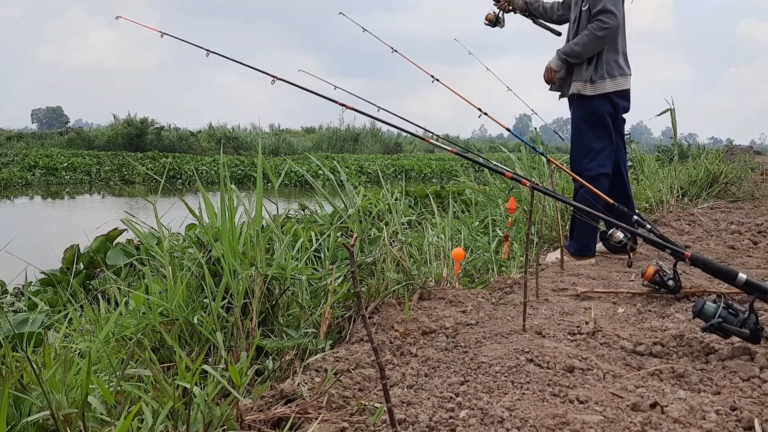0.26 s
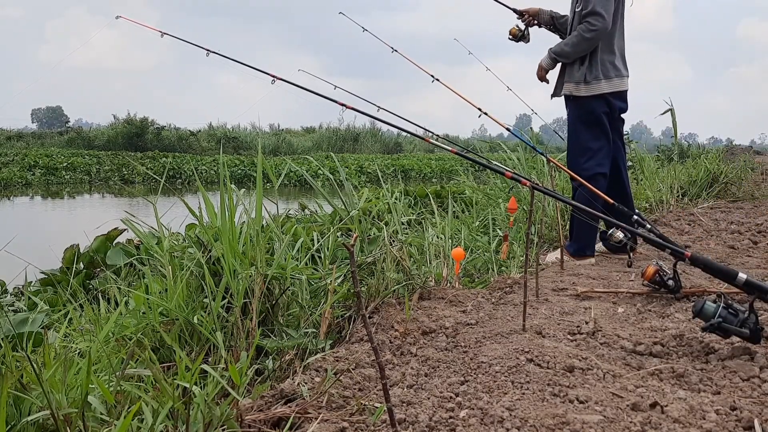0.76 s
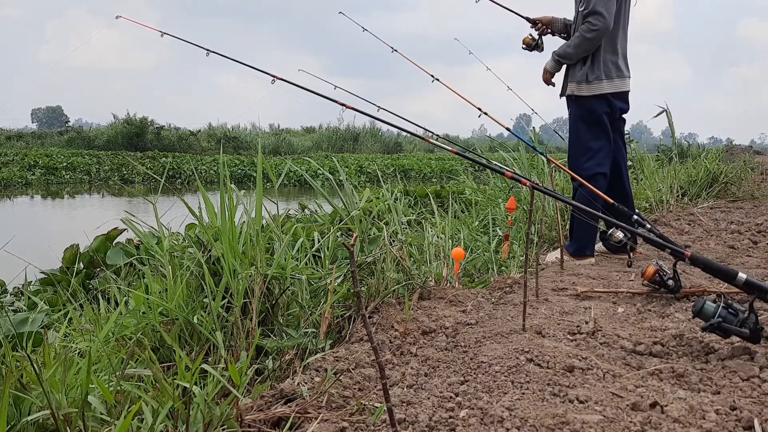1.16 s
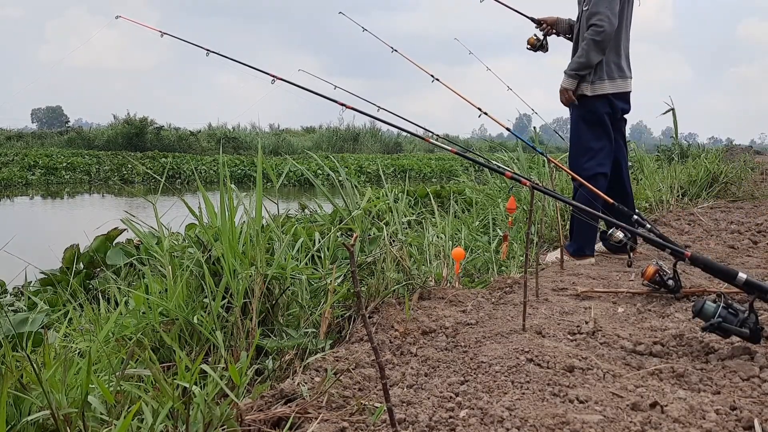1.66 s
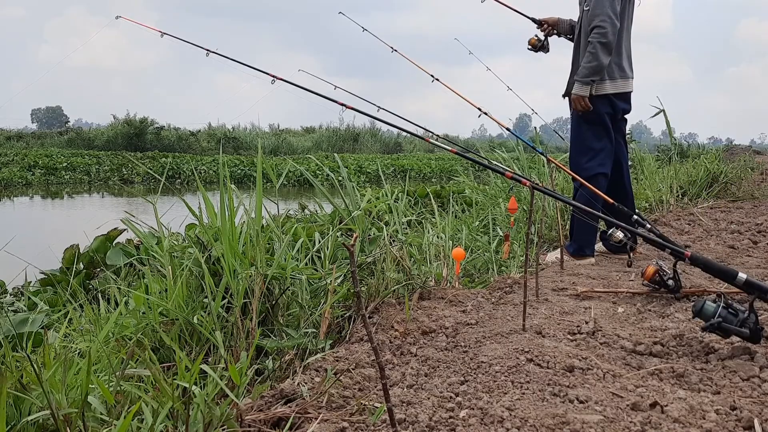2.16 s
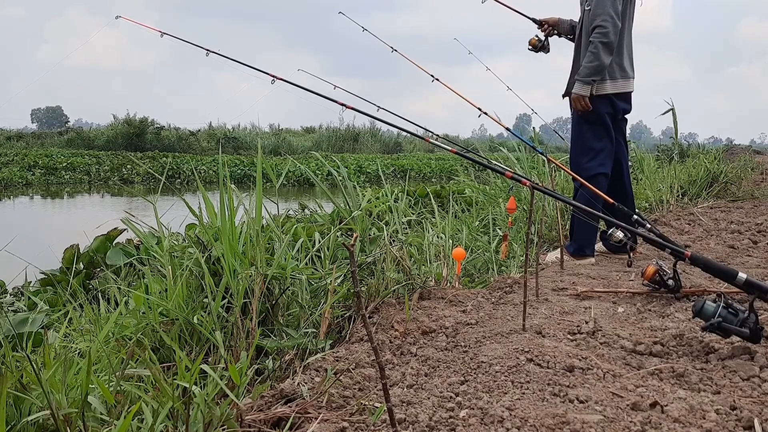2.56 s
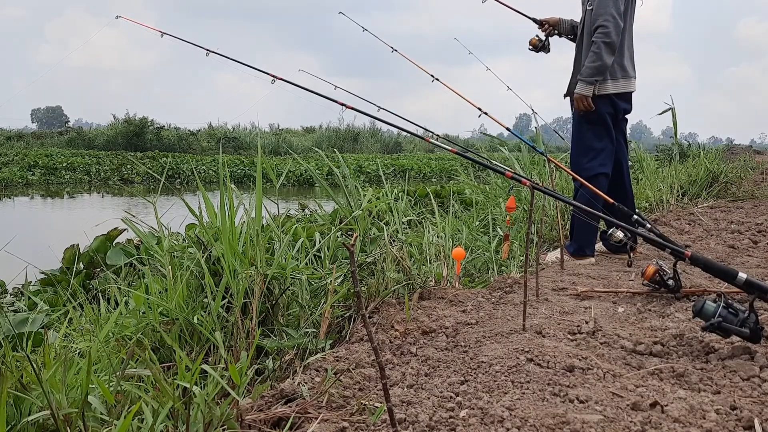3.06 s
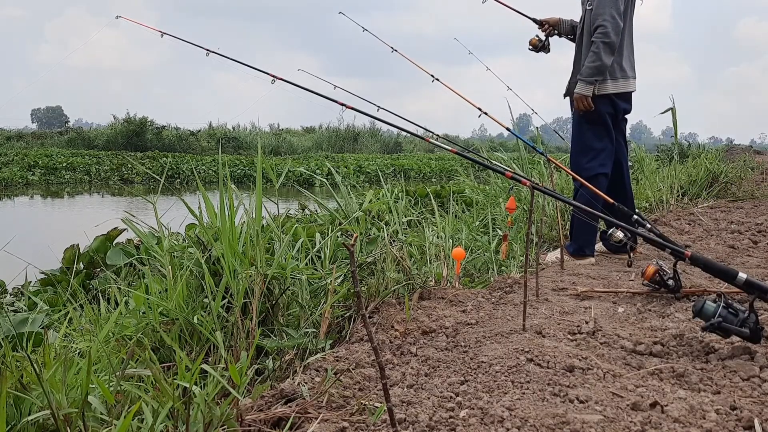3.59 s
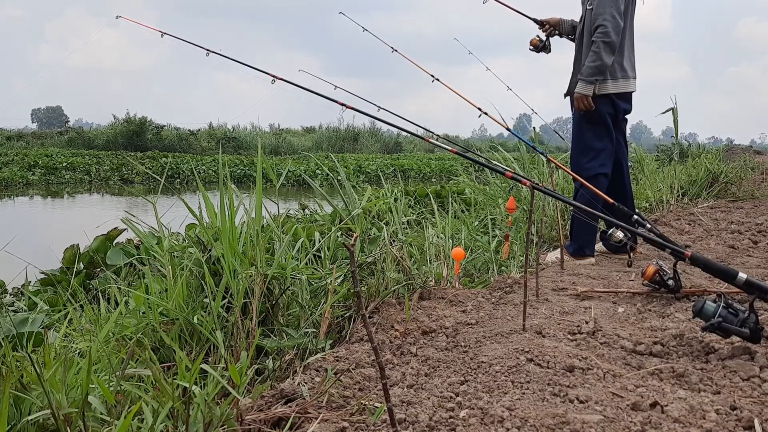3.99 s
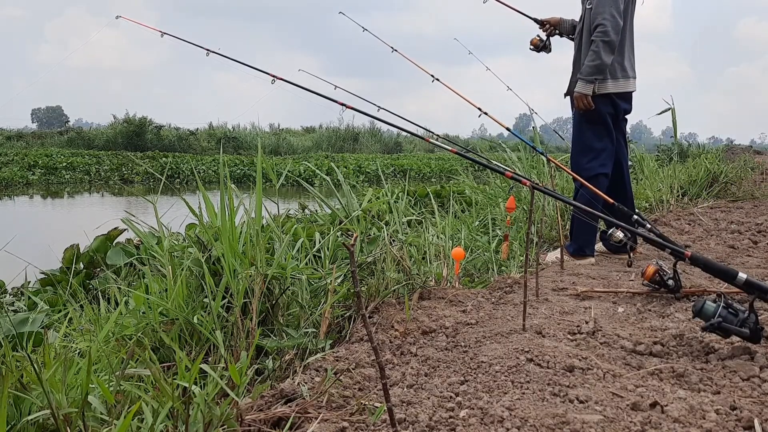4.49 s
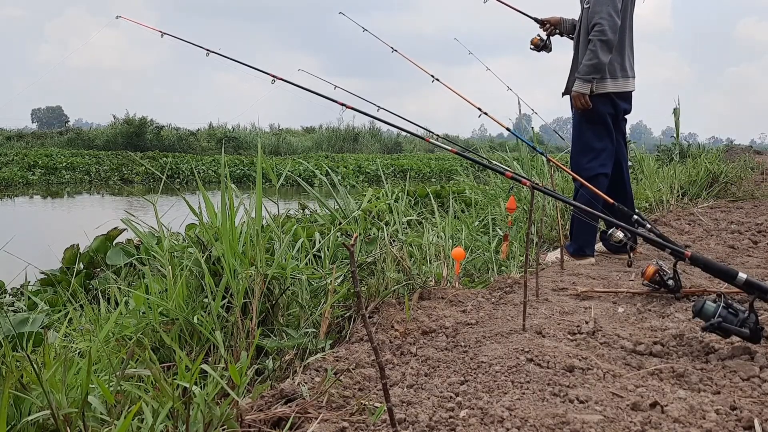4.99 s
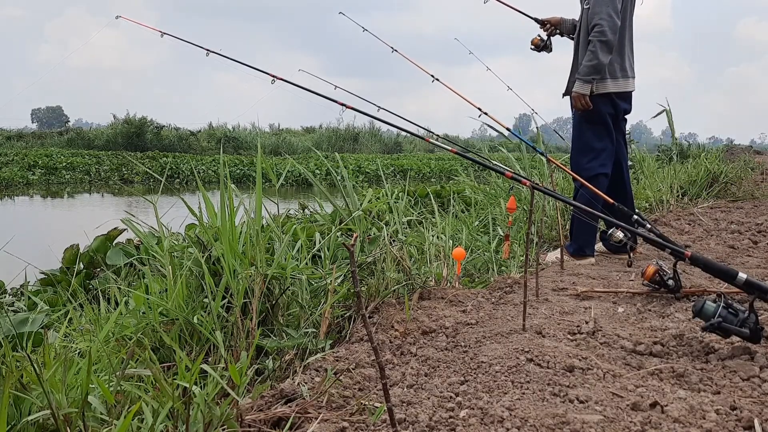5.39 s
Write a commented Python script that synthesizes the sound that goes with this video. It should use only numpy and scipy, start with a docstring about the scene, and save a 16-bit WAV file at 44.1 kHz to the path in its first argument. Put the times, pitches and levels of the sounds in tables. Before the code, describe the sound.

On an open river bank, wind rumbles on the microphone throughout while a distant small engine drones low, fading and swelling with the breeze. Soft gusts thump the right side, mostly around the middle and again near the end. Far quieter, grass hisses and ticks, a cricket pulses, distant road traffic murmurs and a bird gives a few short whistles. The engine fades toward the end.

```python
"""A breezy river bank. Throughout, a far single-cylinder engine drones over air rumbling on the
microphone, hissing, ticking grass, a pulsing cricket and road murmur from the right. An eddy thumps
the right port at once. From 0.7 s a bird whistles faintly; near 0.9 s the exhaust note fades on the
wind, then swells back. More eddies strike from 1.9 to 3.6 s and near 4.8 s. Toward the end the
engine slows slightly and fades again."""
import sys
import numpy as np
from scipy import signal
from scipy.fft import rfft, irfft, next_fast_len
from scipy.io import wavfile
from scipy.ndimage import uniform_filter1d

SR = 44100
rng = np.random.default_rng(int(sys.argv[2]) if len(sys.argv) > 2 else 0)


def store_wav(level_fs):
    """Save 16-bit WAV to argv[1]."""
    pcm = np.round(np.clip(np.atleast_2d(level_fs), -1, 1) * 32767)
    wavfile.write(sys.argv[1], SR, pcm.T.astype(np.int16))


N = 248724
T = np.arange(N) / SR

# Traffic flow. Each row: time in seconds, roar level in dB before trim.
TRAFFIC_LEVEL = [(0.0, -62), (0.5, -60.5), (1.0, -63.5), (3.4, -59), (5.2, -59.5), (5.64, -62)]
# Passing vehicles. Each row: peak time in seconds, half length in seconds, roar lift in dB,
# tyre whine in Hz, whine level in dB.
VEHICLES = [(2.05, .3, 1.3, 790, -60), (2.85, 0.078, 2, 810, -62), (3.68, 0.1, 3.5, 850, -59),
            (4.35, 0.14, 2.2, 873, -60), (5.0, 0.32, 0.4, 850, -64)]
# Tyre roar. Each row: frequency in Hz, relative density in dB.
ROAD_SPECTRUM = [(250, -13), (420, -6.5), (590, -2.5), (780, 6.5), (930, 3), (1150, -13), (1450, -21),
                 (2200, -18.5), (4000, -36)]
# Bird whistles. Each row: peak time in seconds, length in seconds, pitch in Hz, level in dB before pan.
BIRD_CALLS = [(.72, 0.18, 1782, -69), (1.46, 0.22, 2880, -74), (1.989, 0.077, 3145, -69),
              (2.219, 0.16, 2890, -68), (2.441, 0.087, 2810, -68.5), (2.632, 0.074, 2744, -70),
              (3.539, .05, 3098, -68)]
# Breeze in the grass. Each row: time in seconds, hiss level in dB before trim.
BREEZE_LEVEL = [(0.0, -59.5), (0.45, -58), (0.9, -63.5), (1.5, -58), (1.85, -55.5), (2.7, -58.5),
                (3.25, -62), (3.55, -60), (4.1, -65), (4.72, -61.5), (5.05, -64), (5.27, -61), (5.45, -66),
                (5.64, -64.5)]
# Where the grass stirs. Each row: time in seconds, left minus right in dB.
GRASS_PAN = [(0.0, 2), (1.2, 2), (2.1, -1.5), (4.7, 0.5), (5.64, 0.5)]
# Rubbing blades. Each row: frequency in Hz, relative density in dB.
GRASS_SPECTRUM = [(1200, -5), (2800, -1), (4400, -3.5), (6200, 3), (8400, 4), (9700, -0.5), (11500, 2),
                  (13500, 1), (15500, -1)]
# Steady meadow hiss. Each row: frequency in Hz, relative density in dB.
MEADOW_SPECTRUM = [(500, 8.5), (1800, 0.5), (3300, -2), (4800, -2), (6800, -12), (7500, 3.5), (8050, -1),
                   (8600, -0.5), (9600, -5), (10900, -5), (11400, -1), (11900, -11), (15500, -13)]
# Dry blade flicks. Each row: start in seconds, length in seconds, centre in Hz, left and right in dB.
BLADE_TICKS = [(0.386, 0.019, 10500, -53, -61), (0.978, 0.009, 10050, -51, -66),
               (1.207, 0.011, 9550, -50.5, -63), (1.224, 0.041, 11530, -50.5, -64),
               (2.58, 0.011, 11050, -62, -56), (2.758, 0.0078, 12000, -51, -66),
               (2.78, .008, 12000, -51, -64), (2.847, 0.011, 6700, -58, -50.5),
               (2.867, 0.011, 6600, -62, -52), (4.455, 0.019, 7200, -70, -52),
               (4.725, .022, 11550, -59, -60), (4.887, 0.013, 10000, -61, -55),
               (5.597, 0.015, 11060, -58, -65)]
# Air rumble. Each row: frequency in Hz, relative density in dB.
RUMBLE_SPECTRUM = [(20, -34), (30, -15), (42, -1), (60, -2.5), (85, 4.5), (115, 2), (150, -15),
                   (210, -25.5), (400, -38.5), (900, -42.5)]
# Eddy thump. Each row: frequency in Hz, relative density in dB.
EDDY_SPECTRUM = [(20, -35), (32, -8), (48, -6), (65, 9), (100, 3), (150, -10.5), (220, -35.5), (400, -39),
                 (900, -59)]
# Right-port eddies. Each row: peak time in seconds, half length in seconds, thump in dB, flutter in dB.
EDDIES = [(.155, .024, -18, -36), (1.87, .028, -22, -32), (2.07, .04, -27, -44), (2.68, .025, -24, -42),
          (2.77, .04, -17.5, -32), (2.90, .022, -18, -38), (2.955, .02, -22, -42), (3.39, .03, -20.5, -40),
          (3.6, .03, -25, -44), (4.79, .02, -18, -34), (4.82, .018, -25, -26), (4.89, .025, -27, -35)]
# Engine speed. Each row: time in seconds, exhaust note in Hz.
EXHAUST_PITCH = [(0.0, 96.7), (1.05, 97.14), (1.8, 96.1), (4.25, 96.94), (5.64, 95.1)]
# How well the wind carries the engine. Each row: time in seconds, exhaust note level in dB.
WIND_CARRY = [(0.0, -26), (0.19, -22), (0.25, -26), (0.52, -18.5), (0.71, -24), (0.82, -31.5),
              (0.86, -50.5), (1.02, -33), (1.38, -22), (2.45, -20), (2.53, -24.5), (3.52, -20), (4.07, -34),
              (4.19, -26.5), (4.38, -30.5), (4.9, -22), (5.04, -33.5), (5.2, -22.5), (5.28, -25.5),
              (5.51, -43.5), (5.58, -33.5), (5.64, -33)]
# Weaker engine lines. Each row: multiple of the firing rate, mean level in dB.
ENGINE_ORDERS = [(3, -43), (6, -37.5), (7, -49.5), (8, -50.5), (9, -52), (10, -58)]
# Engine block clatter. Each row: centre in Hz, width in Hz, mean level in dB.
BLOCK_BANDS = [(139, 56, -46), (300.7, 61, -53)]


def undb(db):
    """Decibels to gain."""
    return 10 ** (np.asarray(db) / 20)


def unit(x):
    """Scale to rms 1."""
    return x / np.sqrt(np.mean(x ** 2))


def curves(table):
    """Table columns, linearly interpolated in time."""
    times_s, *columns = np.transpose(table)
    return [np.interp(T, times_s, column) for column in columns]


def swell(peak_s, half_s):
    """Gaussian rise and fall, peak 1."""
    return np.exp(-.5 * ((T - peak_s) / half_s) ** 2)


def shaped(gain_at):
    """Noise of rms 1, spectrum set by a function of frequency."""
    size = next_fast_len(N, True)
    hz = np.maximum(np.arange(size // 2 + 1) * SR / size, 1)
    return unit(irfft(rfft(rng.standard_normal(size)) * gain_at(hz), size)[:N])


def noise(spectrum):
    """Noise through (Hz, dB) points, falling away beyond the ends."""
    hz, db = np.transpose(spectrum)
    return shaped(lambda f: undb(np.interp(np.log(f), np.log(hz), db))
                  * np.minimum(1, np.minimum(f / hz[0], hz[-1] / f)) ** 2)


def band(hz, width_hz):
    """Noise in a steep-skirted resonance."""
    return shaped(lambda f: 1 / (1 + ((f - hz * hz / f) / (2 * width_hz)) ** 2 * 2))


def walk(rate_hz):
    """Random steps, smoothed twice; rms 1."""
    hold = int(SR / rate_hz)
    steps = np.repeat(rng.standard_normal(N // hold + 1), hold)
    return unit(uniform_filter1d(uniform_filter1d(steps, hold), hold)[:N])


def pan(db):
    """Channel gains for a left minus right level."""
    return undb(np.array([[.5], [-.5]]) * db)


def spread(make, correlation):
    """Stereo noise from mid and side draws."""
    mid = np.sqrt((1 + correlation) / 2) * make()
    side = np.sqrt((1 - correlation) / 2) * make()
    return np.array([mid + side, mid - side])


def road(roar_trim_db=1.7, hiss_trim_db=-2.0, hiss_db_per_db=2.34, left_lag_s=0.00039):
    """Far tyre roar from the right, brighter as traffic nears; reaches the left port late."""
    level_db, = curves(TRAFFIC_LEVEL)
    level_db += sum(lift_db * swell(peak_s, half_s) for peak_s, half_s, lift_db, _, _ in VEHICLES)
    mean_db = np.mean(level_db)
    roar = spread(lambda: noise(ROAD_SPECTRUM), correlation=0.54) * undb(level_db + roar_trim_db)
    hiss_db = mean_db + hiss_trim_db + hiss_db_per_db * (level_db - mean_db)
    hiss = spread(lambda: band(hz=1087, width_hz=230), correlation=0.85) * undb(hiss_db)
    whine = 0
    for peak_s, half_s, _, hz, whine_db in VEHICLES:
        phase = 2 * np.pi * hz * T
        treads = walk(130) * np.sin(phase) + walk(130) * np.cos(phase)  # many, at nearly one pitch
        whine += treads * undb(whine_db) * swell(peak_s, half_s)
    left, right = roar + hiss + whine
    return np.array([np.interp(T - left_lag_s, T, left), right]) * pan(db=-2.5)


def bird(blur_hz=230):
    """Short whistles that sag, then lift; half blurred by distance into narrow bands."""
    calls = 0
    for peak_s, length_s, hz, db in BIRD_CALLS:
        along = np.clip(2 * (T - peak_s) / length_s, -4, 4)
        glide = 1 + .025 * along + .03 * (along ** 2 - .5) + 0.017 * walk(70)
        whistle = np.sqrt(2) * np.sin(2 * np.pi * np.cumsum(hz * glide) / SR)
        calls += undb(db) * np.exp(-along ** 2) * (0.73 * whistle + 0.75 * band(hz, blur_hz))
    return calls * pan(db=10.0)


def crickets(stroke_hz=8.98, start_db=-62, end_db=-64.5, scatter_db=2.5):
    """One cricket rasps in uneven strokes; others farther off merge into a thin trill."""
    strokes = (.5 + .5 * np.cos(2 * np.pi * stroke_hz * (T - .07))) ** 2
    rasp = spread(lambda: band(hz=7830, width_hz=180), correlation=0.13)
    near = strokes * rasp * undb(np.linspace(start_db, end_db, N) + scatter_db * walk(9))
    chorus = spread(lambda: band(hz=8040, width_hz=96), correlation=0) * undb(-70 + 2.5 * walk(17))
    return near + chorus


def grass(trim_db=5.5):
    """Countless blades rub in the breeze, over steady meadow hiss."""
    breeze_db, = curves(BREEZE_LEVEL)
    side_db, = curves(GRASS_PAN)
    blades = np.array([noise(GRASS_SPECTRUM) * undb(walk(400) + 0.99 * walk(24.94)) for _ in range(2)])
    meadow = spread(lambda: noise(MEADOW_SPECTRUM), correlation=0) * undb(-61.5 + 0.44 * walk(5.3))
    return blades * undb(breeze_db + trim_db + .5 * walk(10)) * pan(side_db) + meadow


def blade_ticks():
    """One dry blade flicks past another: quick rise, short scratchy tail."""
    ticks = np.zeros((2, N))
    for start_s, length_s, hz, left_db, right_db in BLADE_TICKS:
        age = np.maximum(T - start_s, 0) / length_s
        envelope = 2 * np.e * age * np.exp(-2 * age)
        ticks += undb([[left_db], [right_db]]) * envelope * band(hz, width_hz=0.45 * hz)
    return ticks


def wind(rumble_db_per_db=0.12, left_shelter_db=-23.5, window_s=0.043):
    """Air churns on both ports, easing in the lulls that fade the engine; eddies strike the right."""
    carry_db, = curves(WIND_CARRY)
    rumble_db = -34.5 + rumble_db_per_db * (carry_db - np.mean(carry_db)) + 1.6 * walk(7)
    rumble = spread(lambda: noise(RUMBLE_SPECTRUM), correlation=0.78) * undb(rumble_db)
    swirl = noise(EDDY_SPECTRUM)
    # levelled: an eddy's push sets its strength, only its swirl is random
    swirl /= np.sqrt(uniform_filter1d(swirl ** 2, int(SR * window_s)) + 1e-6)
    flutter = band(hz=133, width_hz=39)
    eddies = sum(swell(peak_s, half_s) * (undb(thump_db) * swirl + undb(flutter_db) * flutter)
                 for peak_s, half_s, thump_db, flutter_db in EDDIES)
    return rumble + np.array([undb(left_shelter_db) * eddies, eddies])


def engine(exhaust_order=5, trim_db=-0.02, waver_db=.5, waver_hz=5.99):
    """About 19 firings a second; the exhaust pipe lifts the fifth multiple far above the rest."""
    note_hz, = curves(EXHAUST_PITCH)
    carry_db, = curves(WIND_CARRY)
    breeze_db, = curves(BREEZE_LEVEL)
    firing_phase = 2 * np.pi * np.cumsum(note_hz / exhaust_order) / SR
    drone = undb(carry_db + trim_db + waver_db * walk(waver_hz)) * np.sin(exhaust_order * firing_phase)
    # moving air fades the lines partly together, partly each alone
    fade_db = carry_db - np.mean(carry_db)
    for order, db in ENGINE_ORDERS:
        line_db = db + 0.4 * fade_db + 1.75 * walk(4.87)
        drone += undb(line_db) * np.sin(order * firing_phase + rng.uniform(0, 2 * np.pi))
    # each firing shakes the block; distance smears the knocks to a throb
    throb = unit(1 + 0.11 * np.cos(firing_phase))
    (low_hz, low_width_hz, low_db), (high_hz, high_width_hz, high_db) = BLOCK_BANDS
    clatter = undb(low_db) * spread(lambda: band(low_hz, low_width_hz), correlation=0.61)
    clatter += undb(high_db) * spread(lambda: band(high_hz, high_width_hz), correlation=0.32)
    clatter *= undb(0.32 * fade_db + 0.49 * (breeze_db - np.mean(breeze_db)))  # borne on the breeze
    return np.sqrt(2) * drone * pan(db=-1.0) + throb * clatter


def scene():
    """Stereo mix at the bank."""
    return engine() + wind() + road() + grass() + blade_ticks() + crickets() + bird()


def record(dry):
    """Steep elliptic low-pass cuts the top."""
    cutoff_hz = 15480
    return signal.sosfilt(signal.ellip(12, .1, 80, cutoff_hz, fs=SR, output="sos"), dry)


dry = scene()
out = record(dry)
store_wav(out)
```